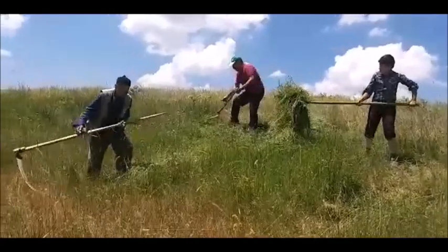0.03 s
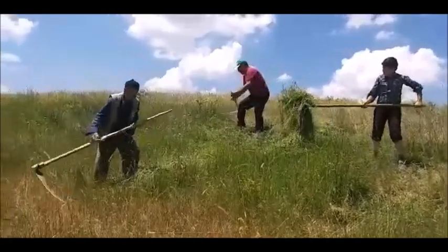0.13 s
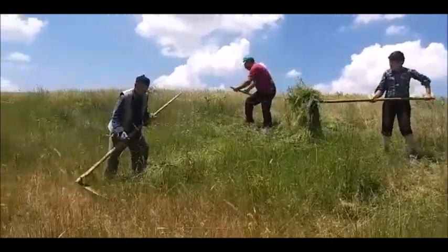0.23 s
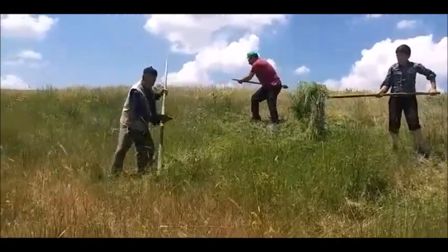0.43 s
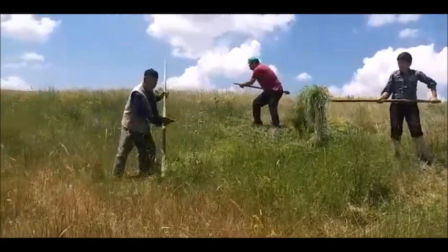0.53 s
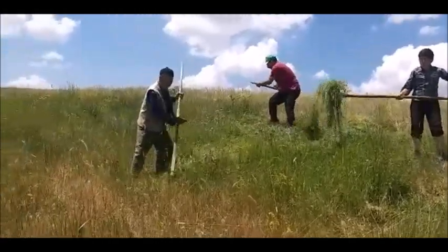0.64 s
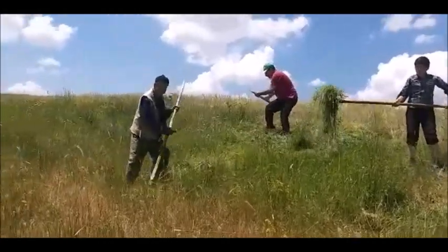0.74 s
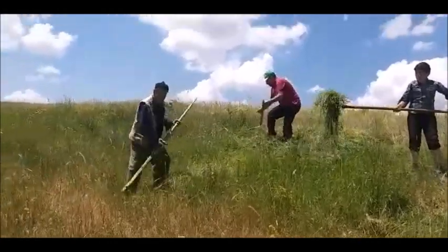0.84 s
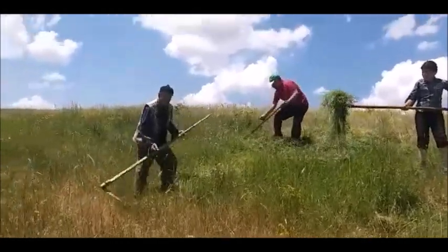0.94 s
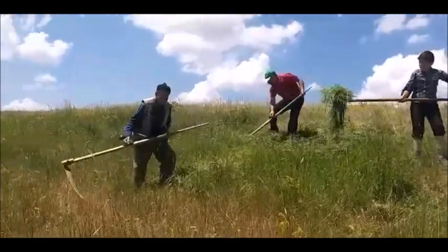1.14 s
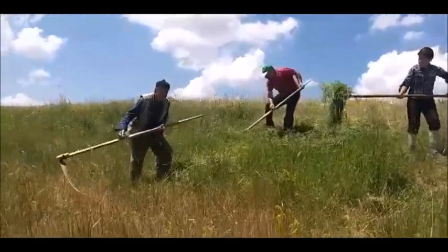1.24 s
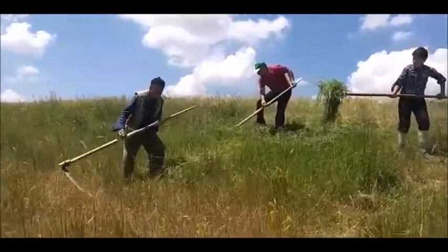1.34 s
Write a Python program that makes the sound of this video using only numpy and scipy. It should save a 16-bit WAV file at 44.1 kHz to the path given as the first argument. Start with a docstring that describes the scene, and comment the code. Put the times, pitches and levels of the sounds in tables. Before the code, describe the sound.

A scythe cuts tall grass twice, with leafy swishes, snapping stems and faint wind.

```python
"""A light breeze and a low insect drone, then two scythe strokes in tall grass: from the left, from ahead.
Each stroke is a swish of leaves brushing the steel and a crunch of cut stems, both sums of tiny impacts,
with a few thick stalks that snap or, in the first stroke, scrape along the edge.
Soft thuds of feet and air and two tiny, high insect chirps complete the open hillside."""
import sys
import numpy as np
from scipy import signal
from scipy.fft import rfft, irfft
from scipy.io import wavfile

SR = 44100
rng = np.random.default_rng(int(sys.argv[2]) if len(sys.argv) > 2 else 0)


def transcribe(signal):
    """Save signal, clipped to [-1, 1], as a 16-bit WAV file at the path in sys.argv[1]."""
    frames = np.atleast_2d(signal).T
    limited = np.clip(frames, -1, 1)
    pcm = np.round(limited * 32767).astype(np.int16)
    wavfile.write(sys.argv[1], SR, pcm)


N = 61739
T, HZ = np.arange(N) / SR, np.fft.rfftfreq(2 * N, 1 / SR)

# Envelopes of the brushing leaves and of the cutting, per stroke: t/s, level/dB
SWISH_LEFT = [(.19, -62), (.235, -47), (.258, -41), (.35, -37), (.45, -46), (.55, -60)]
SWISH_AHEAD = [(.81, -65), (.875, -47), (.935, -41.5), (.968, -48.5), (1.02, -45), (1.12, -41.5),
               (1.2, -46.5), (1.3, -62)]
CUT_LEFT = [(.245, -80), (.265, -53), (.374, -36), (.41, -45), (.435, -43), (.465, -45.5), (.55, -62.5)]
CUT_AHEAD = [(.85, -59.5), (.92, -52), (.971, -50), (.975, -38), (1.035, -45.5), (1.09, -43.5),
             (1.135, -48.5), (1.17, -57.5), (1.26, -66)]
# Spectra of the brushing, the cutting and the breeze: f/Hz, level/dB
SWISH_LEFT_SPECTRUM = [(300, -61), (1500, -17), (3300, -2.5), (5400, 1), (7000, -3.5), (8600, -11),
                       (12000, 1), (16000, -2.5)]
SWISH_AHEAD_SPECTRUM = [(300, -24.5), (1500, -15), (4300, 0), (6200, -3), (8700, -14), (12000, 2),
                        (13600, 0.5), (16000, -9)]
CUT_LEFT_SPECTRUM = [(70, -36), (175, -3), (430, -8.5), (650, -2), (1350, -6), (2100, 1.5), (4500, -11.5),
                     (16000, -61)]
CUT_AHEAD_SPECTRUM = [(60, -12.5), (190, -6), (400, -9.5), (590, 0), (780, -15.5), (1000, -4), (1900, 0),
                      (4500, -7.5), (16000, -20.5)]
BREEZE_SPECTRUM = [(25, -25), (125, -9), (280, -13), (750, -7), (1200, -10.5), (5000, -11), (9400, -18),
                   (13000, -8), (16000, -14)]
# Breaking stalks: t/s, crack level/dB, decay time/s, f/Hz, spit level/dB
SNAPS_LEFT = [(.3645, -43.5, 0.0082, 2060, -30), (.4275, -33.5, 0.0078, 1960, -52),
              (.436, -28.5, 0.0027, 1880, -50)]
SNAPS_AHEAD = [(.9735, -31, 0.0052, 3450, -42), (.981, -32, 0.0038, 1430, -53),
               (1.003, -33.5, 0.0061, 1800, -37), (1.083, -25.5, 0.0044, 3300, -39),
               (1.094, -29, 0.006, 3200, -54)]
# Stalks dragging along the edge: t/s, duration/s, level/dB, f/Hz, bandwidth/Hz
SCRAPES = [(.255, 0.013, -39.5, 3613, 810), (0.262, 0.026, -39, 5280, 160), (.35, .06, -48, 1020, 60),
           (0.353, 0.047, -37, 2248, 91), (0.419, 0.031, -40, 2143, 220), (0.469, 0.018, -43.5, 2190, 160)]
# Envelope of the breeze: t/s, level/dB
GUSTS = [(0, -52.5), (.06, -51), (.14, -52.5), (.2, -55), (.5, -52), (.77, -51), (1.33, -54.5),
         (1.4, -52.5)]
# Insect chirps: t/s, duration/s, level/dB, starting f/Hz
CHIRPS = [(0.1958, 0.029, -39, 11750), (1.298, 0.013, -51.5, 11860)]
# Wingbeat of a flying insect: t/s, f/Hz, level/dB
DRONE = [(0, 142.8, -61), (.22, 123.5, -67), (0.312, 137.3, -65), (.45, 138.4, -60), (0.53, 119.4, -92),
         (1.0, 107.7, -79.5), (1.14, 102.1, -61.5), (1.4, 106, -66)]
# Wingbeat harmonics, from the fundamental up: level/dB
WING_HARMONICS = [0, -11.5, -14]
# Thuds of feet and air: t/s, duration/s, f/Hz, level/dB, leftward bias/dB
THUDS = [(0.652, 0.031, 108.3, -56, -9), (0.983, 0.063, 43, -63, 15), (1.125, 0.017, 209, -48.5, 1.5)]
# Coherence of the two channels for each source: f/Hz, shared fraction of power
LEFT_COHERENCE = [(200, 0.89), (2300, 0.52), (7000, 0.01)]
AHEAD_COHERENCE = [(200, 1), (3200, 0.8), (6000, 0.43)]
BREEZE_COHERENCE = [(700, 0.34), (16000, 0.035)]
# Left minus right sensitivity: f/Hz, level/dB
CHANNEL_BALANCE = [(100, -2.5), (1200, 1), (3000, 0), (6800, 6), (8200, -3), (9200, 4), (11000, -9.5),
                   (15000, -2)]


def swish(envelope, colour, coherence, lead_ms, body_growth=0.21):
    """Friction of countless leaves on steel: a fine hiss, and a body that grows faster with pressure."""
    clicks = impacts(per_s=15000, spread_db=1.5) * amp(1.5 * wander(seconds=0.016))
    rustle = stereo(stalk_resonances(clicks, colour), coherence, lead_ms)
    body = filtered(rustle, lowpass(9000, slope=8))
    hiss = rustle - body
    pressure = level(envelope)
    swell = (pressure / pressure.max()) ** body_growth
    return pressure * (hiss + swell * body) / band_rms(rustle, 10500, 16000)


def cut(envelope, colour, coherence, lead_ms, bass_growth=0.35):
    """Fracture of many stems: sparser impulses sum to a crunch whose bass grows as the blade bites."""
    clicks = impacts(per_s=3500, spread_db=1) * amp(-0.08 * wander(seconds=0.016))
    crunch = stereo(stalk_resonances(clicks, colour), coherence, lead_ms)
    bass = filtered(crunch, lowpass(480, slope=6))
    bite = level(envelope)
    swell = (bite / bite.max()) ** bass_growth
    return bite * (crunch - bass + swell * bass) / band_rms(crunch, 300, 2800)


def snaps(rows, coherence, lead_ms, rise_s=0.00085):
    """Fracture of a thick stalk excites a broad, damped resonance; tearing fibres add a thin spit."""
    out = np.zeros((3, N))
    dull = np.sqrt(lowpass(6700, slope=12))
    spit = resonance(hz=13700, q=3.2)
    for start, db, decay, hz, spit_db in rows:
        age = np.maximum(T - start, 0)
        burst = rng.standard_normal((3, N)) * np.minimum(age / rise_s, 1) * np.exp(-age / decay)
        crack = dull * resonance(hz, q=0.72)
        out += filtered(burst, amp(db) * crack + amp(spit_db) * spit)
    return stereo(out, coherence, lead_ms)


def scrapes(coherence, lead_ms, pitch_sag=0.03):
    """Sliding friction of a tough stalk on the edge: brief narrow-band noise that sags in pitch."""
    out = np.zeros((3, N))
    for start, length, db, hz, width_hz in SCRAPES:
        slide = np.clip((T - start) / length, 0, 1)
        phase = 2 * np.pi * np.cumsum(hz * (1 - pitch_sag * (slide - .5))) / SR
        in_phase, quadrature = filtered(rng.standard_normal((2, 3, N)), lowpass(width_hz / 2, slope=2))
        rasp = (in_phase * np.cos(phase) + quadrature * np.sin(phase)) * np.sin(np.pi * slide)
        out += amp(db) * np.sqrt(length * SR) * rasp / np.linalg.norm(rasp, axis=1, keepdims=True)
    return stereo(out, coherence, lead_ms)


def breeze(body_growth=2.14):
    """Wind-driven impacts in standing grass: the low rustle follows the gusts more than the hiss does."""
    clicks = impacts(per_s=16000, spread_db=4.0)
    rustle = stereo(stalk_resonances(clicks, BREEZE_SPECTRUM), BREEZE_COHERENCE, lead_ms=0)
    rustle /= np.std(rustle.mean(0))
    body = filtered(rustle, lowpass(2870, slope=4))
    gust_db = np.interp(T, *np.transpose(GUSTS))
    swell = amp(body_growth * (gust_db - gust_db.max()))
    return amp(gust_db) * (rustle - body + swell * body)


def chirps(glide_hz_per_s=18600, waver_hz=71, ramp_s=0.0041, right_db=5):
    """Frequency modulation: short, very high insect notes rise and waver, off to the right."""
    out = np.zeros(N)
    for start, length, db, hz in CHIRPS:
        age = np.clip(T - start, 0, length)
        pitch = hz + glide_hz_per_s * age + waver_hz * wander(seconds=0.0069)
        gate = np.minimum(np.minimum(age, length - age) / ramp_s, 1)
        out += amp(db) * gate * np.sqrt(2) * np.sin(2 * np.pi * np.cumsum(pitch) / SR)
    return out * amp([[-right_db], [right_db]])


def drone(waver=0.025, flutter_db=2.5, right_db=1):
    """Periodic wingbeats radiate a harmonic series that fades in and out as a large insect flies about."""
    times, hz, db = np.transpose(DRONE)
    pitch = np.interp(T, times, hz) * (1 + waver * wander(seconds=0.013))
    cycles = np.cumsum(pitch) / SR
    wings = np.zeros(N)
    for k, harmonic_db in enumerate(WING_HARMONICS, 1):
        gain = amp(harmonic_db + flutter_db * wander(seconds=0.017))
        wings += gain * np.sin(2 * np.pi * (k * cycles + rng.random()))
    return amp(np.interp(T, times, db)) * unit(wings) * amp([[-right_db], [right_db]])


def thuds():
    """Pressure pulses from feet and air: a few low cycles each, under a smooth envelope."""
    out = np.zeros((2, N))
    for start, length, hz, db, left_db in THUDS:
        age = np.clip(T - start, 0, length)
        pulse = np.sin(np.pi * age / length) ** 2 * np.sqrt(2) * np.sin(2 * np.pi * hz * age)
        out += amp([[db + left_db], [db - left_db]]) * pulse
    return out


def impacts(per_s, spread_db):
    """Shot noise: three independent trains of tiny clicks of uneven size."""
    size = amp(spread_db * np.minimum(rng.exponential(1, (3, N)), 4))
    return size * rng.choice([-1, 1], (3, N)) * (rng.random((3, N)) < per_s / SR)


def stalk_resonances(clicks, colour, depth_db=4.5, spacing_hz=129, life_s=0.062):
    """Resonance: each stirred clump briefly favours its own pitches, rippling the mean spectrum."""
    coloured = filtered(clicks, amp(spectrum(colour)))
    frames = signal.stft(coloured, nperseg=1024, noverlap=768)[2]
    per_hz = np.fft.fftfreq(frames.shape[1], SR / 1024)
    per_s = np.fft.fftfreq(frames.shape[2], 256 / SR)
    smooth = np.exp(-(per_hz[:, None] * spacing_hz) ** 2 - (per_s * life_s) ** 2)
    ripple = unit(np.fft.ifft2(np.fft.fft2(rng.standard_normal(smooth.shape)) * smooth).real)
    return signal.istft(frames * amp(depth_db * ripple), nperseg=1024, noverlap=768)[1][:, :N]


def stereo(three, coherence, lead_ms):
    """Partial coherence: a shared wave, lead_ms earlier on the left, plus a scattered wave per side."""
    shared = np.clip(spectrum(coherence), 0, 1)
    side = np.array([[.5], [-.5]])
    direct = filtered(three[0], np.sqrt(shared) * np.exp(2j * np.pi * HZ * side * lead_ms / 1000))
    scattered = filtered(three[1:], np.sqrt(1 - shared))
    return filtered(direct + scattered, amp(side * spectrum(CHANNEL_BALANCE)))


def resonance(hz, q):
    """Response of two like resonators in cascade, with mean power 1."""
    gain = 1 / (1 + 1j * q * (HZ / hz - hz / (HZ + 1))) ** 2
    return gain / np.sqrt(np.mean(abs(gain) ** 2))


def lowpass(hz, slope):
    """Gain falling as frequency to the power -slope above hz."""
    return 1 / (1 + (HZ / hz) ** slope)


def amp(db):
    """Amplitude ratio of a level in decibels."""
    return 10 ** (np.asarray(db) / 20)


def unit(x):
    """Normalisation to rms 1."""
    return x / np.sqrt(np.mean(x ** 2) + 1e-20)


def spectrum(points):
    """Interpolation over log frequency."""
    hz, value = np.transpose(points)
    return np.interp(np.log(HZ + 1), np.log(hz + 1), value)


def level(points):
    """Amplitude envelope through (t/s, level/dB) points; zero outside them."""
    times, db = np.transpose(points)
    return amp(np.interp(T, times, db)) * (T >= times[0]) * (T <= times[-1])


def filtered(x, gain):
    """Linear filtering by multiplication of the spectrum."""
    return irfft(rfft(x, 2 * N) * gain)[..., :N]


def band_rms(x, lo_hz, hi_hz):
    """Rms of the channel mean within a band."""
    return np.std(filtered(x.mean(0), (HZ > lo_hz) & (HZ < hi_hz)))


def wander(seconds):
    """Smooth random fluctuation of rms 1."""
    return unit(filtered(rng.standard_normal(N), np.exp(-(HZ * seconds) ** 2)))


def scene():
    """Superposition of both strokes and the sounds of the meadow."""
    left, ahead = (LEFT_COHERENCE, 0.11), (AHEAD_COHERENCE, -0.018)  # coherence, left lead/ms
    first = swish(SWISH_LEFT, SWISH_LEFT_SPECTRUM, *left) + cut(CUT_LEFT, CUT_LEFT_SPECTRUM, *left)
    first += snaps(SNAPS_LEFT, *left)
    second = swish(SWISH_AHEAD, SWISH_AHEAD_SPECTRUM, *ahead)
    second += cut(CUT_AHEAD, CUT_AHEAD_SPECTRUM, *ahead) + snaps(SNAPS_AHEAD, *ahead)
    return first + scrapes(*left) + second + breeze() + chirps() + drone() + thuds()


def record(dry, cutoff_hz=16000):
    """Band limiting: a steep low-pass filter removes the highest treble."""
    kernel = signal.firwin(511, cutoff_hz, window=("kaiser", 9), fs=SR)
    return signal.oaconvolve(dry, kernel[None], "same")


dry = scene()
out = record(dry)
transcribe(out)
```